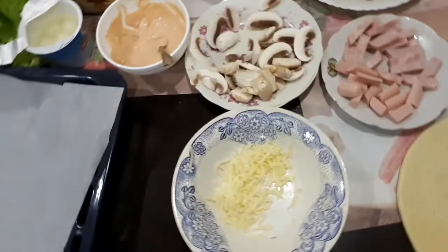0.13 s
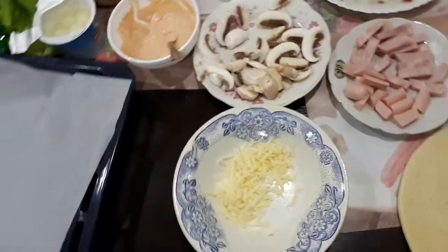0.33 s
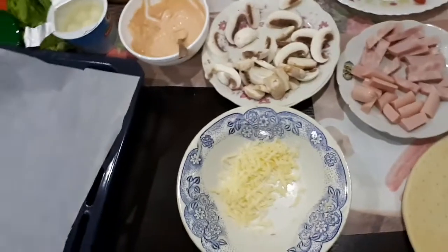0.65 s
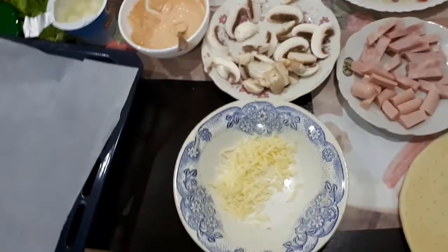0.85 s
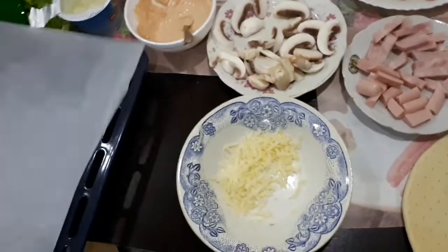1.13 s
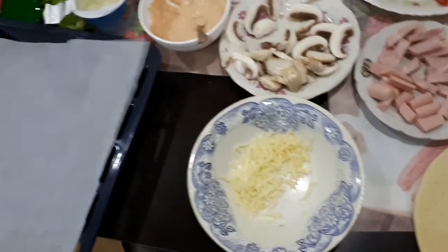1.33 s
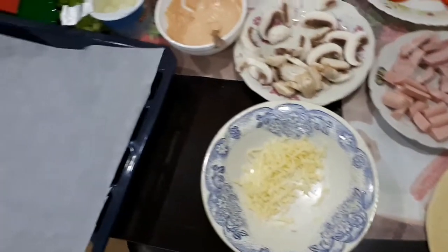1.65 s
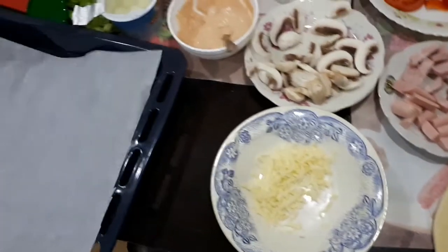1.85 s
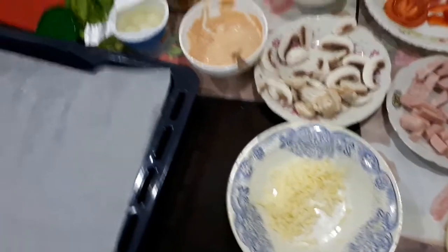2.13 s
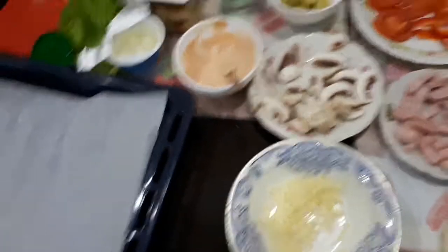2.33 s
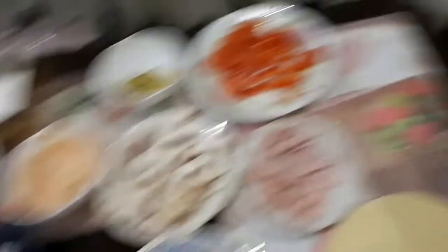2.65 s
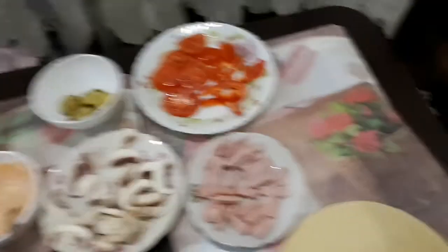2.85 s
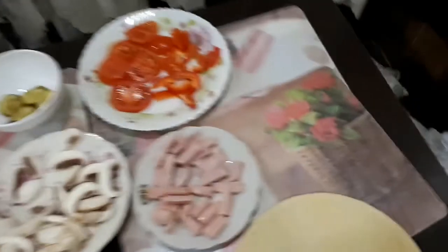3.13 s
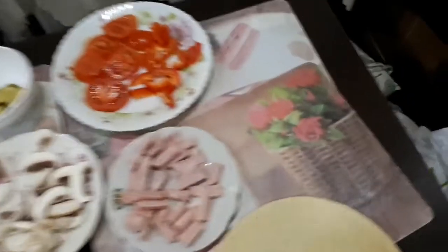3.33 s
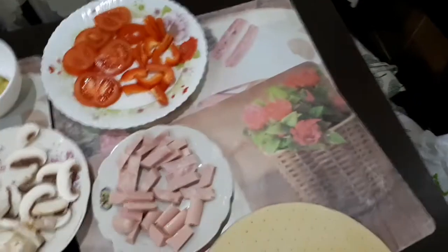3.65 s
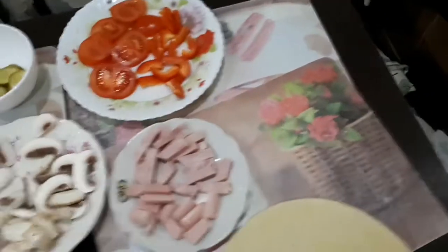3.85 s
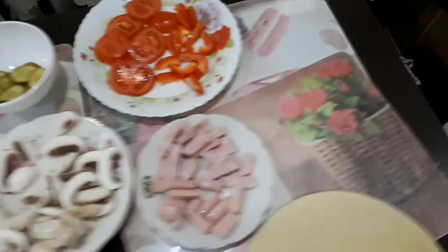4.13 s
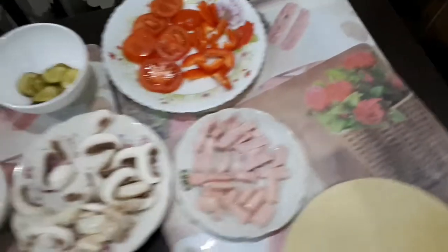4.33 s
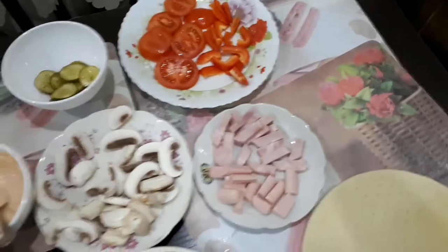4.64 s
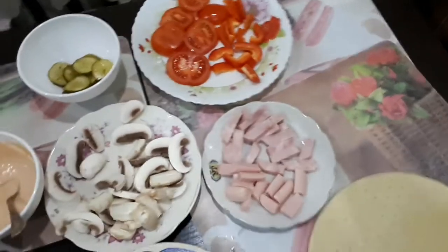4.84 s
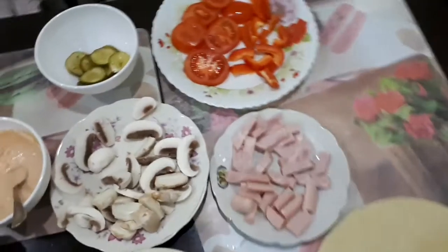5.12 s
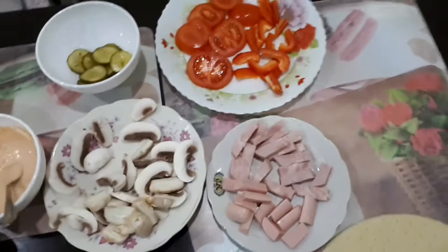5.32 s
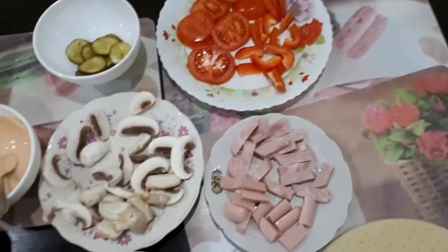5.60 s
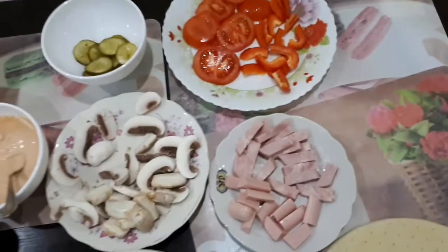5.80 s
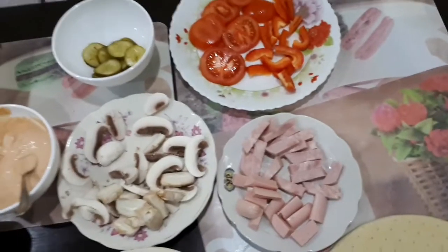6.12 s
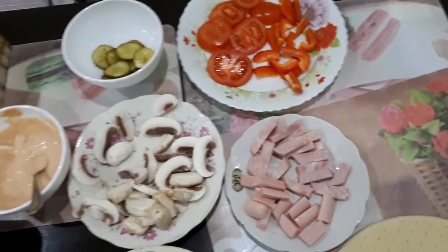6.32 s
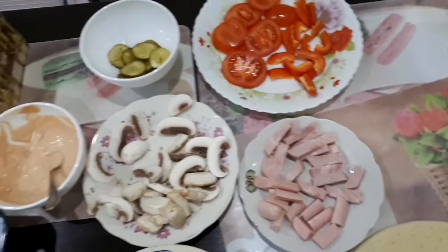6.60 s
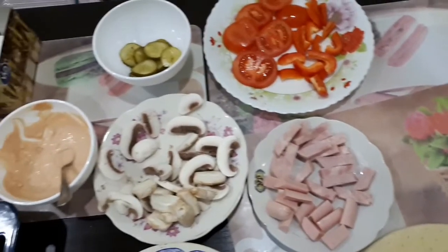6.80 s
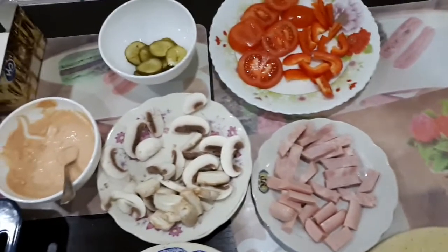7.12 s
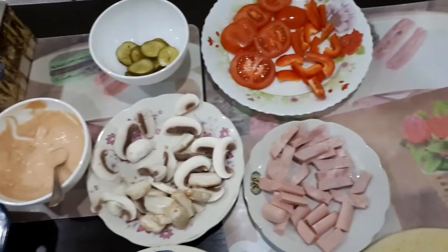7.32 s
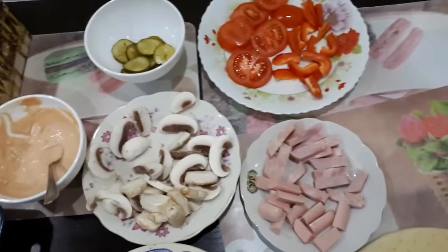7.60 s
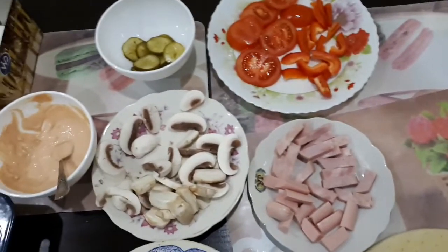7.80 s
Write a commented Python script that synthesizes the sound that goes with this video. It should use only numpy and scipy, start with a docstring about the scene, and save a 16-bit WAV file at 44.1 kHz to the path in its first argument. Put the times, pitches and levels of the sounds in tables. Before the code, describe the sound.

A small, hard-walled kitchen heard close in stereo, with faint room noise and a soft low air rumble. In the first 0.9 seconds there are only very quiet tray bumps and a barely audible rising whistle of paper edge. From 1.0 to 1.5 seconds baking parchment is pressed in a short burst of crackles and papery flaps. At about 1.64 a sharp, bright metallic click stands out, ringing briefly. Small, sparse crinkles follow until 2.6. From 2.7 to 5.3 the hand smooths the sheet in about ten quick, dry rubbing swishes, roughly every 0.3 seconds, with fine crackle, snapping creases and dull drumming of thin metal beneath. From 5.4 the strokes become short presses with a low boom; after a brief lull near 6.0, crisp crumpling thickens, its brightest snaps around 6.3 to 6.6, and irregular crackling continues to the end near 8 seconds.

```python
"""Small hard-walled kitchen: baking parchment is pressed and smoothed into a metal tray on a table.
Rubbing, fine crackle and drumming are filtered random clicks, shaped by presses, sweeps and drag of the hand.
Creases snap as short noise bursts; tray knocks, one of them sharp, are noise plus decaying modes.
A faint whistle glides up; room quiet and a rumble of air lie underneath.
Dense random reflections make the room; two microphone ports colour it differently."""
import sys
import numpy as np
from scipy import signal
from scipy.fft import rfft, irfft
from scipy.io import wavfile
from scipy.ndimage import uniform_filter1d

SR = 44100
rng = np.random.default_rng(int(sys.argv[2]) if len(sys.argv) > 2 else 0)


def master(y):
    """Save y as 16-bit WAV."""
    cut = np.clip(np.atleast_2d(y).T, -1, 1)
    pcm = np.round(cut * 32767)  # scale
    wavfile.write(sys.argv[1], SR, pcm.astype(np.int16))


N = 351036
TIME_S = np.arange(N) / SR

# larger creases snapping, levels before trims: (time [s], treble crack [dB], flap of the sheet [dB])
SNAPS = [(0.98, -48, -38), (1.0111, -38, -35.5), (1.0544, -30, -29), (1.0714, -32, -23.5),
         (1.132, -25.5, -22), (1.164, -24, -25), (1.261, -22.5, -23.5), (1.4315, -32, -34),
         (1.5522, -35, -36.5), (1.9051, -42, -38), (2.1112, -30, -32.5), (2.1542, -29.5, -40),
         (2.1754, -36, -35), (2.2631, -40, -36), (2.5657, -42, -40), (2.6942, -34, -32),
         (2.7192, -22.5, -37), (2.7603, -22, -28.5), (2.959, -28, -33.5), (3.0389, -27.5, -25.5),
         (3.2211, -29, -29), (3.563, -34, -44), (3.912, -26, -30.5), (3.9534, -32, -29),
         (4.4134, -28.5, -31), (4.89, -22.5, -33.5), (4.9877, -21, -26), (5.4395, -26, -33),
         (5.589, -24.5, -31.5), (5.7324, -25, -41), (5.8561, -33, -34.5), (6.0082, -44, -45.5),
         (6.0711, -41, -47), (6.098, -29.5, -32.5), (6.1204, -31, -29.5), (6.137, -21.5, -29),
         (6.191, -28.5, -50), (6.3342, -18, -33), (6.3845, -33, -25.5), (6.5729, -20.5, -30),
         (6.6037, -22.5, -27.5), (6.6245, -13.5, -25), (6.7496, -32.5, -35.5), (6.7752, -25, -30),
         (6.7947, -21, -34.5), (6.8667, -28.5, -36), (6.9152, -22, -41), (7.1022, -24.5, -34),
         (7.1847, -24, -34.5), (7.2647, -23.5, -30.5), (7.3685, -31, -37), (7.434, -26, -42),
         (7.5747, -28, -27), (7.6545, -28, -32), (7.7832, -27, -27.5)]
# tray shifts and knocks: (time [s], level before trim [dB], rattle length [s], brightness [dB/octave],
# table thump above the knock [dB], first strike above the knock [dB])
KNOCKS = [(0.268, -55.5, 0.13, -8, -0.5, -2), (0.5642, -41, 0.06, -1, -2.5, 3),
          (0.677, -51.5, 0.022, -4.5, -5, -3), (0.794, -45, 0.0095, -6.5, -16, 4),
          (1.603, -37, 0.007, 3, -21, -2), (1.6438, -15.5, 0.052, 0.5, -47, 3),
          (1.9824, -43.5, 0.015, 0.5, -26, -5), (2.31, -49, 0.041, 0.5, -32, 3)]
# ring of the tray: (frequency [Hz], relative level [dB], t60 [s])
TRAY_MODES = [(308, -10, .45), (339, -15, .65), (528, -7, .25), (655, -3, .22), (701, -4, .3),
              (808, -4, .2), (873, -5, .22), (1035, -6, .26), (1280, -3, .18), (1360, -3, .2),
              (1533, -1, .23), (1792, 0, .22), (1858, 1, .25), (1903, 1, .24), (1965, -1, .2),
              (2075, 0, .24), (2144, 1, .26), (2197, -3, .24), (2333, -2, .28), (2570, -5, .27),
              (2603, -5, .3), (3941, -12, .22), (4075, -11, .24)]
# modes of the table top: (frequency [Hz], relative level [dB], t60 [s])
TABLE_MODES = [(191, -4.5, .15), (221, -6, .17), (254, -3.5, 0.19), (287.7, -2, 0.26)]
# spectrum of tray contacts: (frequency [Hz], relative density [dB per Hz])
CLACK_SPECTRUM = [(40, -34), (100, -26), (150, -13.5), (400, -16), (750, -4.5), (1000, -7.5), (1350, -2),
                  (1950, -1.5), (2550, -7), (2900, -17.5), (3900, -11.5), (5000, -22.5), (7500, -25.5),
                  (16000, -40.5)]
# spectrum of rubbing fibres: (frequency [Hz], relative density [dB per Hz])
RUB_SPECTRUM = [(40, -38), (300, -33), (800, -12), (1300, 0.5), (1700, 2), (2200, -1.5), (3000, -3),
                (4300, -7.5), (6500, -25.5), (9000, -19), (16000, -65)]
# spectrum of popping wrinkles: (frequency [Hz], relative density [dB per Hz])
CRACKLE_SPECTRUM = [(40, -31), (200, -27), (800, -5), (2300, -1), (4000, 6), (5300, 0.5), (6500, 5),
                    (8000, -3), (9700, -8), (12500, -4.5), (16000, -20)]
# spectrum of the drumming metal: (frequency [Hz], relative density [dB per Hz])
DRUM_SPECTRUM = [(30, -38), (105, -24), (145, -21.5), (200, -2), (245, -6.5), (310, -1.5), (390, -6.5),
                 (560, -1), (760, 3), (1050, 4.5), (1500, -13), (3000, -24.5)]
# spectrum of the flapping sheet: (frequency [Hz], relative density [dB per Hz])
FLAP_SPECTRUM = [(40, -35), (150, -27), (600, -13), (1300, -2), (2300, -1.5), (3300, -4.5), (6000, -13.5),
                 (16000, -53)]
# spectrum of a crease's crack: (frequency [Hz], relative density [dB per Hz])
CRACK_SPECTRUM = [(40, -53), (500, -20), (2000, -10), (4000, 0.5), (6500, 4), (9500, -7), (12500, -4),
                  (16000, -9)]
# spectrum of the room's quiet: (frequency [Hz], relative density [dB per Hz])
QUIET_SPECTRUM = [(25, -28), (70, -20), (190, -1.5), (500, -10.5), (2200, -14), (6000, -15), (16000, -33)]
# spectrum of air buffeting a port: (frequency [Hz], relative density [dB per Hz])
AIR_SPECTRUM = [(20, -4.5), (70, -2.5), (130, -1.5), (1000, -69)]
# decay of the kitchen's reflections: (frequency [Hz], t60 [s])
KITCHEN_DECAY = [(100, 0.11), (300, 0.34), (800, 0.28), (2000, 0.32), (6000, 0.28), (15000, 0.23)]
# microphone port colour: (frequency [Hz], left minus right [dB])
PORTS = [(100, -2), (600, -0.5), (1200, -2.5), (1900, -5.5), (2500, -5), (4000, -2), (6000, 2),
         (8000, -2.5), (15000, -1)]
# palm sweeps, levels before trims: (fastest moment [s], rubbing [dB], build-up [s], slowing [s],
# fine crackle above the rubbing [dB], drumming of the tray above the rubbing [dB])
SWEEPS = [(2.775, -34.5, 0.016, 0.042, -9, -7), (3.059, -29, 0.023, 0.032, -8.5, -11.5),
          (3.38, -30, 0.081, 0.049, -13, -9), (3.678, -27, 0.051, 0.037, -7.5, -7.5),
          (3.966, -30.5, 0.028, 0.043, -10, -8), (4.234, -25, 0.043, 0.031, -9, -10.5),
          (4.505, -28, 0.049, 0.063, -12, -10.5), (4.77, -30.5, 0.058, 0.046, -11, -11.5),
          (5.033, -25, 0.036, 0.054, -9.5, -12.5), (5.29, -32.5, 0.033, 0.022, -8.5, -13.5)]
# light drag of the hand: (time [s], rubbing before trim [dB])
DRAG = [(0, -70), (.2, -68), (.5, -80), (.9, -62), (2.5, -56.5), (2.8, -39.5), (4.4, -42.5), (5.25, -39),
        (5.5, -44.5), (5.85, -47.5), (6.0, -67), (6.08, -55.5), (6.15, -41.5), (7.0, -47.5), (7.96, -54)]
# fingers press and crumple the sheet, levels before trims: (start [s], length [s], rubbing [dB],
# fine crackle above the rubbing [dB], drumming of the tray above the rubbing [dB])
PRESSES = [(0.21, 0.2, -54.5, -10.5, -9), (1.008, 0.21, -30.5, -1.5, -17), (1.18, 0.17, -34.5, -4, -6.5),
           (1.362, 0.096, -39.5, -2.5, -10.5), (1.497, 0.092, -48, -12, -17), (1.981, 0.25, -41, -28, -31),
           (2.308, 0.079, -41.5, -6.5, -14), (2.444, 0.03, -42.5, -3.5, -3.5),
           (2.556, 0.15, -42.5, -6, -12), (2.92, 0.18, -37.5, -4, -14), (4.32, 0.023, -32.5, -11, -8),
           (4.885, 0.037, -42, -2, -32), (5.415, 0.15, -44, 0, -4.5), (5.585, 0.037, -36, 0, -9),
           (5.725, 0.042, -35, 3.5, -9.5), (5.85, 0.028, -43, -6, 2), (6.11, 0.12, -41, -9, -6.5),
           (6.227, 0.066, -32.5, -2, -8.5), (6.323, 0.088, -32.5, -14, -7), (6.49, 0.034, -37, 1.5, -4),
           (6.573, 0.055, -29.5, -2, -5.5), (6.767, 0.072, -32, -9, -7), (6.843, 0.023, -45, -9, -9),
           (6.911, 0.057, -35, -6, -9.5), (7.076, .06, -42.5, -2, -3.5), (7.175, 0.12, -36, -3, -7),
           (7.313, 0.11, -36, -3.5, -9.5), (7.422, 0.052, -30.5, -1, -6.5), (7.573, 0.1, -41.5, -6, -2.5),
           (7.634, 0.19, -38.5, -3, -6.5), (7.766, 0.046, -24, -8.5, -22), (7.805, 0.26, -32, -2.5, -4)]
# palm leaning on the tray's floor: (start [s], length [s], boom [dB])
LEANS = [(3.013, 0.08, -60.5), (3.335, .18, -79), (4.206, 0.045, -66), (4.72, 0.17, -70),
         (5.444, 0.19, -54.5), (7.876, .09, -60)]
# place of the hands on the sheet: (time [s], left minus right [dB])
HAND_PLACE = [(0, -0.5), (2.2, -0.5), (5.2, -0.1), (5.7, 1), (7.96, .5)]

PORT_LAG_SAMPLES, EDGE_HZ = 17, 16200
DRAG_CRACKLE_DB, DRAG_DRUM_DB, AIR_DB = -7.5, -7, -40.5  # relative to the rubbing
PRESS_ATTACK_S, PRESS_SAG_DB, PRESS_RELEASE_S = 0.0069, -3, 0.0087
RUB_TRIM_DB, DRUM_TRIM_DB, CRACK_TRIM_DB, FLAP_TRIM_DB, KNOCK_TRIM_DB = -3, -2, -18.5, -12.5, -9.5
# the sheet's bulge tightens as it is pressed in
BULGE_HZ, BULGE_RISE_HZ_PER_S, BULGE_WANDER_HZ, BULGE_WANDER_S = 1920, 54, 134, 0.14
BOOM_HZ, BOOM_T60_S = 138.6, 0.34  # lowest mode of the tray's floor
KNOCK_PAN_DB = -0.5  # left minus right


def gain_of(db):
    """Decibels to amplitude."""
    return 10 ** (np.asarray(db) / 20)


def evened(x):
    """Scales to rms 1."""
    return x / np.sqrt(np.mean(x ** 2) + 1e-20)


def read(points, hz):
    """Reads a table on a log-frequency axis."""
    f, value = np.transpose(points)
    return np.interp(np.log(hz + 1), np.log(f + 1), value)


def add(mix, start_s, sound):
    """Adds a sound to the mix at start_s."""
    part = mix[round(start_s * SR):][:len(sound)]
    part += sound[:len(part)]


def colour(x, spectrum, tilt_db_per_octave=0, size=2048):
    """Causal (minimum-phase) filter of unit energy with the given spectrum, tilted about 2 kHz."""
    hz = abs(np.fft.fftfreq(size, 1 / SR))
    octaves = np.log2((hz + 100) / 2000)
    log_gain = np.log(gain_of(read(spectrum, hz) + tilt_db_per_octave * octaves))
    minimum_phase = np.exp(np.conj(signal.hilbert(log_gain)))
    taps = np.fft.ifft(minimum_phase).real
    return signal.oaconvolve(x, taps / np.linalg.norm(taps))[:len(x)]


def grains(per_s, spread_db, cap):
    """Random clicks of either sign; exponential dB sizes up to cap make most small, a few large."""
    size = gain_of(spread_db * np.minimum(rng.exponential(1, N), cap))
    sign = rng.choice([-1, 1], N)
    return evened(size * sign * (rng.random(N) < per_s / SR))


def wander(smooth_s):
    """Slow random drift of rms 1."""
    size = round(smooth_s * SR)
    once = uniform_filter1d(rng.standard_normal(N), size)
    return evened(uniform_filter1d(once, size))


def resonate(x, hz, width_hz):
    """Two-stage resonance following the curve hz, run at zero frequency and turned back; rms 1."""
    turn = np.exp(2j * np.pi * np.cumsum(hz * np.ones(N)) / SR)
    r = np.exp(-np.pi * width_hz / SR)
    once = signal.lfilter([1 - r], [1, -r], x / turn + 1e-18)
    twice = signal.lfilter([1 - r], [1, -r], once)
    return evened((turn * twice).real)


def ringing(modes, t):
    """Sum of exponentially decaying modes of a struck body, at random phases."""
    return sum(gain_of(db - 60 * t / t60_s) * np.sin(2 * np.pi * (hz * t + rng.random()))
               for hz, db, t60_s in modes)


def panned(pan_db):
    """Gains of the two ports for a left minus right level difference."""
    return gain_of(np.reshape([pan_db / 2, -pan_db / 2], (2, -1)))


def kitchen(x, wet_db, shift_samples=0, build_s=0.00049, mono_hz=650):
    """Direct sound reaches the left port first; dense reflections follow, alike at both in the bass."""
    t = np.arange(SR * 2 // 5) / SR
    signs = rng.choice([-1., 1.], (2, len(t)))
    reflections = signs * (rng.random((2, len(t))) < 8000 / SR) * (1 - np.exp(-t / build_s))
    hz, age_s, z = signal.stft(reflections, SR, nperseg=256)
    same = (1 / (1 + (hz / mono_hz) ** 4))[:, None]
    z[1] = same * z[0] + np.sqrt(1 - same ** 2) * z[1]
    decay = gain_of(-60 * age_s / read(KITCHEN_DECAY, hz)[:, None])
    tail = signal.istft(z * decay, SR, nperseg=256)[1]
    paths = gain_of(wet_db) * tail / np.linalg.norm(tail, axis=1, keepdims=True)
    paths[0, 0] += 1
    paths[1, PORT_LAG_SAMPLES + int(shift_samples)] += 1
    return signal.fftconvolve(x[None], paths / np.linalg.norm(paths[0]), axes=1)[:, :len(x)]


def wandering(x, wet_db, per_s):
    """Hands move about the sheet: per_s times a second the sound crossfades to new room paths."""
    hop = SR // per_s
    # padding lets each room tail ring on
    window = np.pad(np.sqrt(signal.windows.hann(2 * hop, sym=False)), (0, SR // 4))
    padded = np.pad(x, (hop, len(window)))
    out = np.zeros((2, len(padded)))
    for start in range(0, N + hop, hop):
        span = slice(start, start + len(window))
        out[:, span] += kitchen(padded[span] * window, wet_db, shift_samples=rng.integers(-2, 3))
    return out[:, hop:hop + N]


def room_quiet():
    """Steady coloured noise, mostly reflected, as the quiet of the room."""
    return gain_of(-70.5) * kitchen(colour(rng.standard_normal(N), QUIET_SPECTRUM), wet_db=26)


def air_rumble(rub):
    """Air stirred by the hands buffets each port separately, over a faint constant rumble."""
    noise = np.array([colour(port, AIR_SPECTRUM) for port in rng.standard_normal((2, N))])
    return (gain_of(-76.5) + gain_of(AIR_DB) * rub) * noise


def held(start_s, length_s):
    """Pressure comes on quickly, sags while it is held, and is let go."""
    age_s = np.maximum(TIME_S - start_s, 0)
    attack = np.minimum(age_s / PRESS_ATTACK_S, 1)
    sag = gain_of(PRESS_SAG_DB * np.minimum(age_s / length_s, 1))
    return attack * sag * np.exp(-np.clip((age_s - length_s) / PRESS_RELEASE_S, 0, 20))


def hands():
    """Strengths of rubbing, crackling and drumming: drag, sweeps and presses add in power."""
    drag = gain_of(np.interp(TIME_S, *np.transpose(DRAG)))
    power = (drag * gain_of([[0], [DRAG_CRACKLE_DB], [DRAG_DRUM_DB]])) ** 2
    for s, db, build_s, slow_s, crackle_db, drum_db in SWEEPS:
        distance = np.maximum((s - TIME_S) / build_s, (TIME_S - s) / slow_s)
        speed = 1 / np.cosh(np.minimum(distance, 20))
        power += speed ** 2 * gain_of([[db], [db + crackle_db], [db + drum_db]]) ** 2
    for s, length_s, db, crackle_db, drum_db in PRESSES:
        power += held(s, length_s) ** 2 * gain_of([[db], [db + crackle_db], [db + drum_db]]) ** 2
    return np.sqrt(power)


def catching(per_s, release_s, depth):
    """Paper catches and lets go: each release is a sudden flurry that dies away."""
    releases = rng.uniform(0.83, 1, N) * (rng.random(N) < per_s / SR)
    flurries = signal.lfilter([1], [1, -np.exp(-1 / (release_s * SR))], releases)
    return evened(1 + depth * flurries)


def crinkles(rub, per_s=45, spread_db=4, crack_s=0.0017, level_db=-16):
    """Small creases flip at random, each a decaying noise burst, as loud as the rubbing allows."""
    sizes = abs(grains(per_s, spread_db, cap=2.5))
    flips = signal.lfilter([1], [1, -np.exp(-1 / (crack_s * SR))], sizes + 1e-12)
    return gain_of(level_db) * rub * evened(colour(flips * rng.standard_normal(N), CRACK_SPECTRUM))


def rustle(rub, crackle, drum, bulge_db=-6, bulge_width_hz=750, boom_db=-25):
    """Strokes drag the sheet over the tray: fibres rub, wrinkles pop, metal drums and booms beneath."""
    slips = colour(grains(per_s=5000, spread_db=2.5, cap=2.6), RUB_SPECTRUM)
    bulge_hz = BULGE_HZ + BULGE_RISE_HZ_PER_S * TIME_S + BULGE_WANDER_HZ * wander(BULGE_WANDER_S)
    bulge = resonate(grains(per_s=2700, spread_db=0.5, cap=3.1), bulge_hz, bulge_width_hz)
    rubbing = gain_of(RUB_TRIM_DB) * rub * (slips + gain_of(bulge_db) * bulge)
    # wrinkles pop in three shades, from dull to bright, mixed together
    pops = sum(colour(grains(per_s=700, spread_db=5.5, cap=3.9), CRACKLE_SPECTRUM, tilt)
               for tilt in np.linspace(-2, 2, 3))
    sheet = rubbing + crackle * evened(pops)
    taps = colour(grains(per_s=2500, spread_db=0.0, cap=0.99), DRUM_SPECTRUM)
    metal = gain_of(DRUM_TRIM_DB) * drum * taps
    leaning = sum(gain_of(db) * held(s, length_s) for s, length_s, db in LEANS)
    weight = gain_of(boom_db) * drum + leaning
    boom = weight * resonate(rng.standard_normal(N), BOOM_HZ, width_hz=35)
    stroked = (sheet + metal) * catching(per_s=130, release_s=0.0052, depth=1.34)
    return stroked + boom + crinkles(rub)


def knocks(ring_db=-7, rattle_db=-3, strike_s=0.0045, strike_tilt_db_per_octave=3.0, boom_db=-30):
    """Tray strikes and chatters on the table; sheet metal rings, floor booms, table top thumps."""
    contacts, bodies, t = np.zeros(N), np.zeros(N), np.arange(SR * 3 // 4) / SR
    for s, db, rattle_s, tilt, thump_db, strike_db in KNOCKS:
        a, b = rng.standard_normal((2, len(t)))
        # the first contact is the brightest
        hit = colour(a * np.exp(-t / strike_s), CLACK_SPECTRUM, tilt + strike_tilt_db_per_octave)
        strike = gain_of(strike_db) * hit
        chatter = gain_of(rattle_db) * colour(b * np.exp(-(t / rattle_s) ** 2), CLACK_SPECTRUM, tilt)
        fed = 1 - np.exp(-t / (.5 * rattle_s))  # the modes build up while the chatter lasts
        parts = (ring_db, TRAY_MODES), (thump_db, TABLE_MODES), (boom_db, [(BOOM_HZ, 0, BOOM_T60_S)])
        body = sum(gain_of(part_db) * evened(fed * ringing(modes, t)) for part_db, modes in parts)
        force = gain_of(db + KNOCK_TRIM_DB)
        add(contacts, s, force * evened(strike + chatter))
        add(bodies, s, force * body)
    return kitchen(contacts, wet_db=6.5) + kitchen(bodies, wet_db=-2.5)


def squeak(start_s=0.76, length_s=0.25, low_hz=4700, high_hz=7900, waver=0.022):
    """Paper's edge slides ever faster along the rim: a faint, wavering, rising sine whistle."""
    out, glide_hz = np.zeros(N), np.linspace(low_hz, high_hz, round(length_s * SR))
    drift = evened(uniform_filter1d(rng.standard_normal(N), size=40))[:len(glide_hz)]
    hz = glide_hz * (1 + waver * drift)
    whistle = np.sin(2 * np.pi * np.cumsum(hz) / SR)
    add(out, start_s, gain_of(-72) * whistle * signal.windows.tukey(len(hz), .5))
    return out


def snaps(crack_s=0.0019, flap_s=0.0034, settle_s=0.0026, settle_db=-19,
          ring_s=0.0053, ring_db=-3, low_hz=1900, high_hz=2700):
    """A crease flips with a brief crack; the sheet around it flaps, rings for a moment and settles."""
    out, t = np.zeros(N), np.arange(4096) / SR
    for s, crack_db, flap_db in SNAPS:
        a, b = rng.standard_normal((2, len(t)))
        settle = gain_of(settle_db) * np.exp(-t / settle_s)
        crack = colour(a * (np.exp(-t / crack_s) + settle), CRACK_SPECTRUM)
        ring = np.sin(2 * np.pi * rng.uniform(low_hz, high_hz) * t) * np.exp(-t / ring_s)
        flutter = colour(b * (np.exp(-t / flap_s) + settle), FLAP_SPECTRUM)
        flap = evened(flutter) + gain_of(ring_db) * evened(ring)
        add(out, s, gain_of(crack_db + CRACK_TRIM_DB) * evened(crack)
            + gain_of(flap_db + FLAP_TRIM_DB) * evened(flap))
    return out


def scene():
    """Paper and tray in the kitchen, over the quiet of the room and a rumble of air at each port."""
    rub, crackle, drum = hands()
    quiet = room_quiet()
    air = air_rumble(rub)
    strokes = wandering(rustle(rub, crackle, drum) + squeak(), wet_db=2.5, per_s=10)
    paper = strokes + wandering(snaps(), wet_db=1.0, per_s=3)
    place = panned(np.interp(TIME_S, *np.transpose(HAND_PLACE)))
    return place * paper + panned(KNOCK_PAN_DB) * knocks() + quiet + air


def record(dry):
    """Each port has its own colour; the very loudest peaks are rounded off; then the band limit."""
    half_db = read(PORTS, np.fft.rfftfreq(N, 1 / SR)) / 2
    ported = irfft(rfft(dry) * gain_of([half_db, -half_db]), N)
    rounded = ported / (1 + (ported / .9) ** 6) ** (1 / 6)
    band_limit = signal.firwin(255, EDGE_HZ, window=("kaiser", 9), fs=SR)
    return signal.oaconvolve(rounded, band_limit[None], "same")


dry = scene()
out = record(dry)
master(out)
```